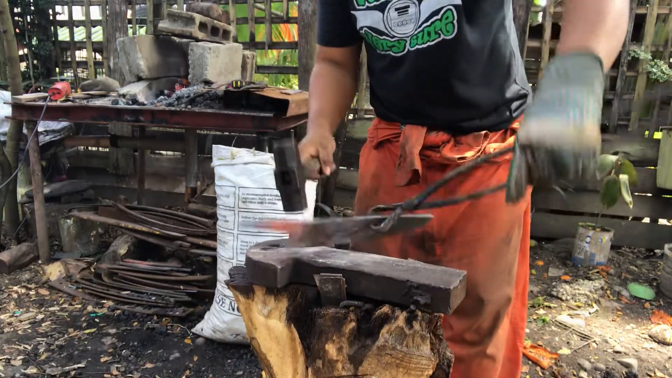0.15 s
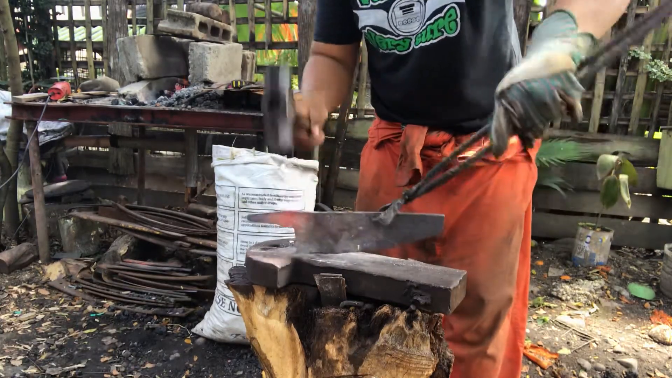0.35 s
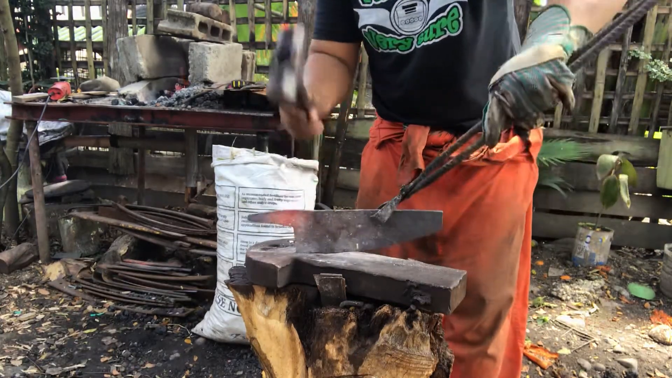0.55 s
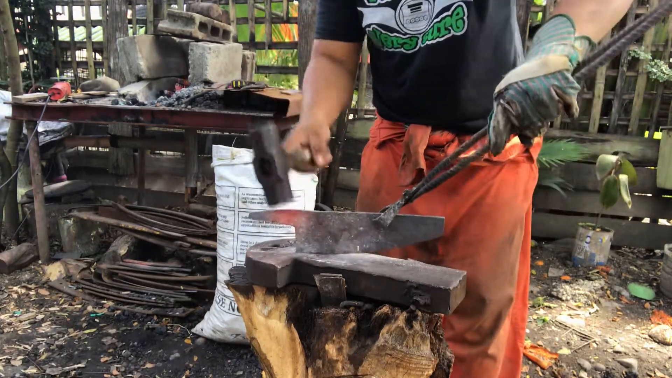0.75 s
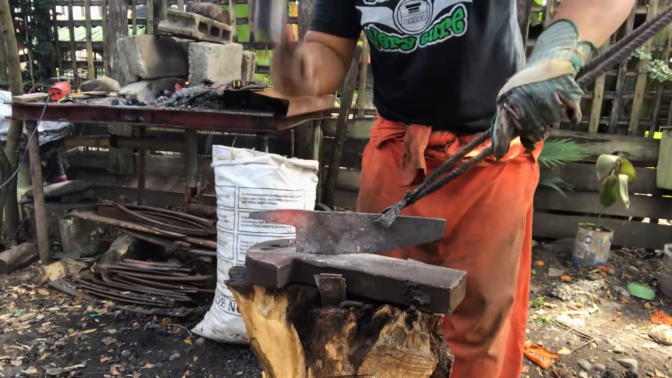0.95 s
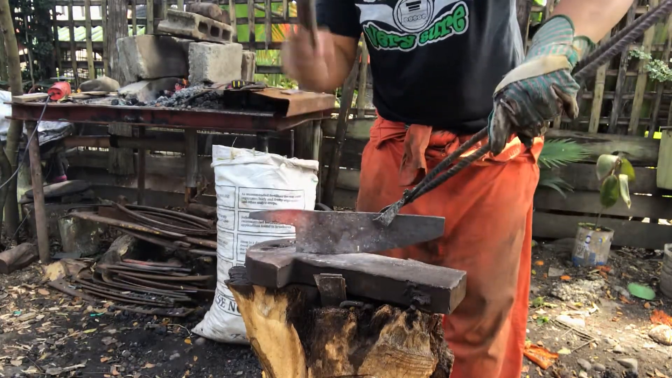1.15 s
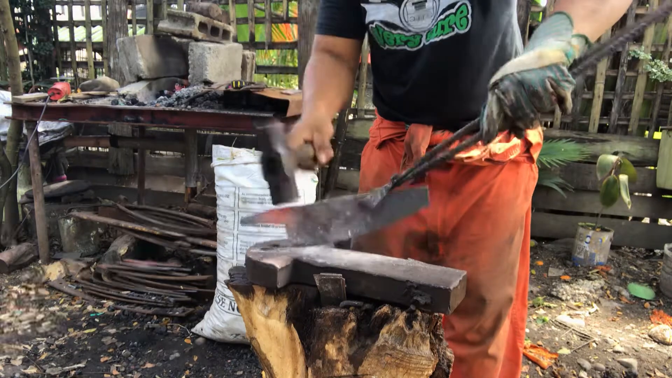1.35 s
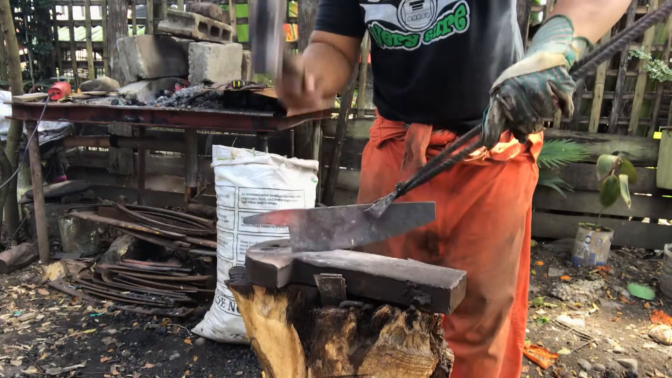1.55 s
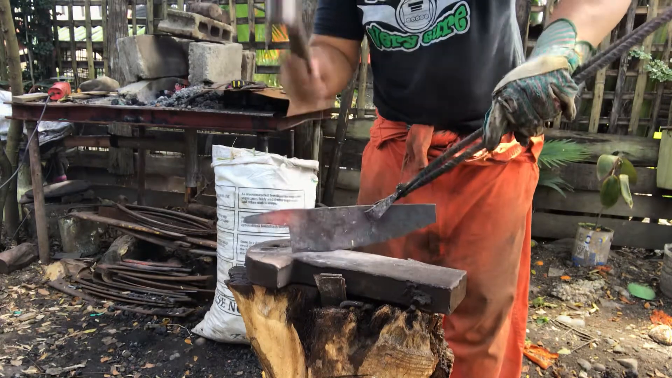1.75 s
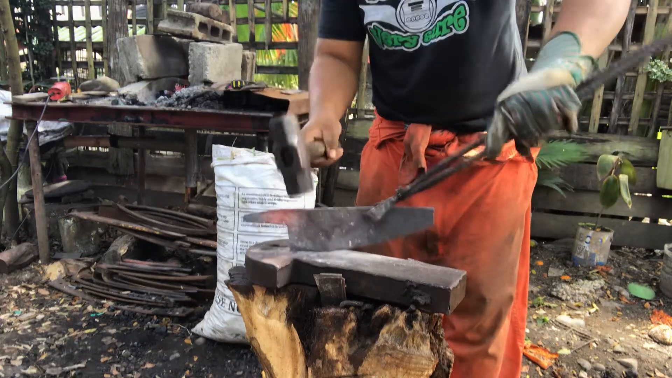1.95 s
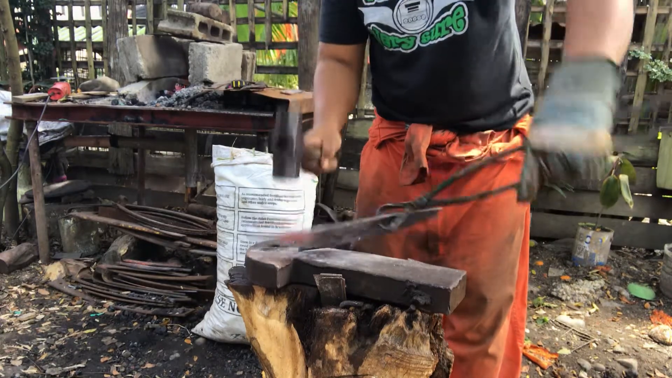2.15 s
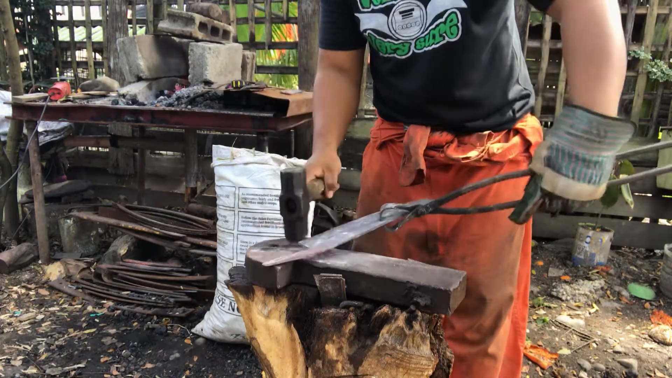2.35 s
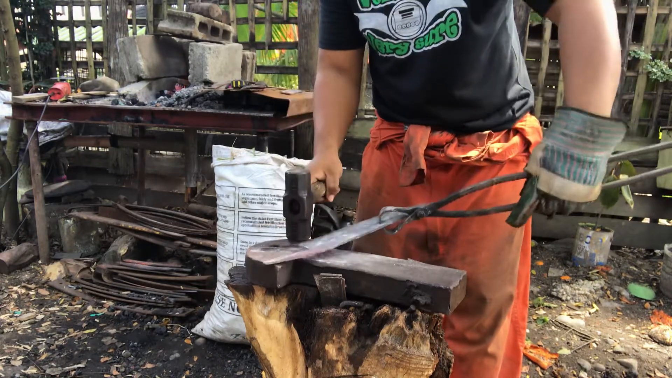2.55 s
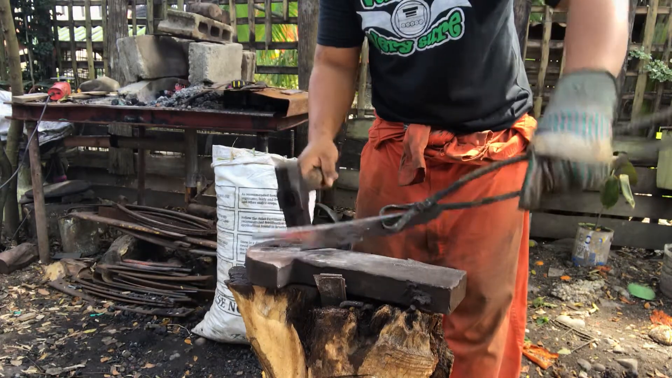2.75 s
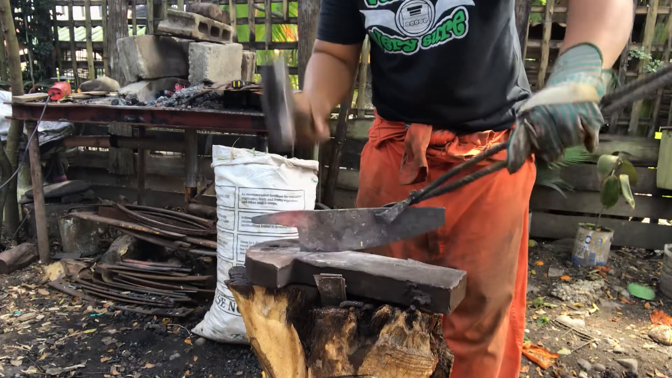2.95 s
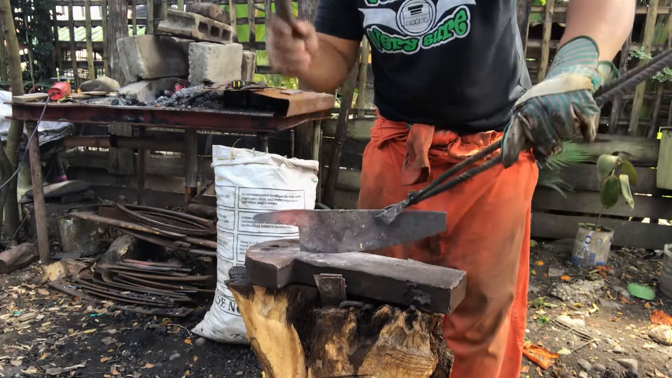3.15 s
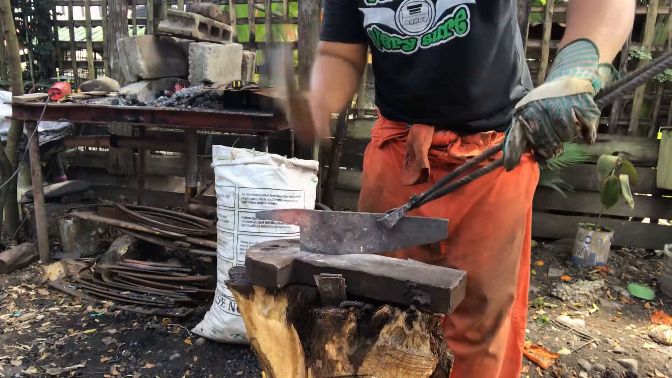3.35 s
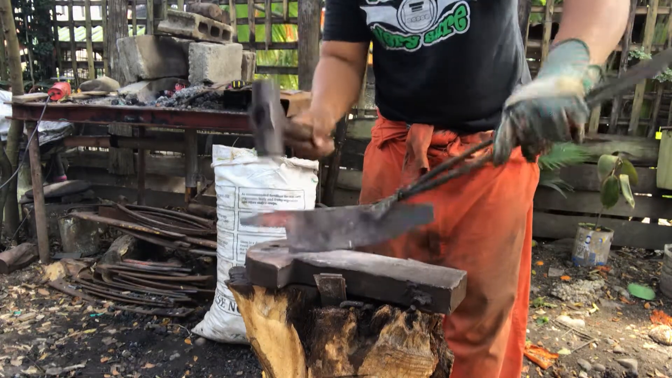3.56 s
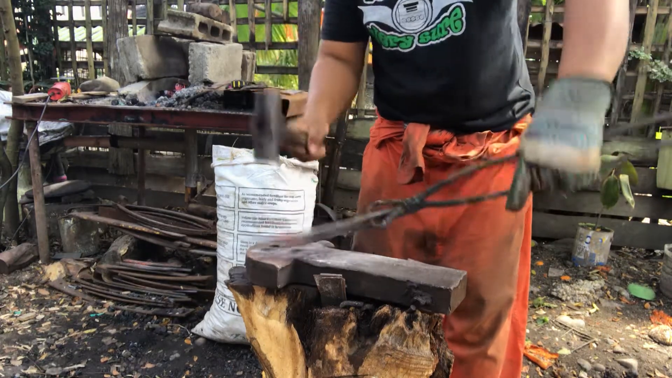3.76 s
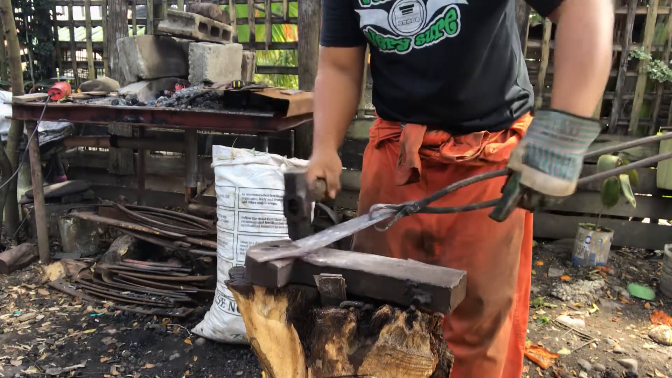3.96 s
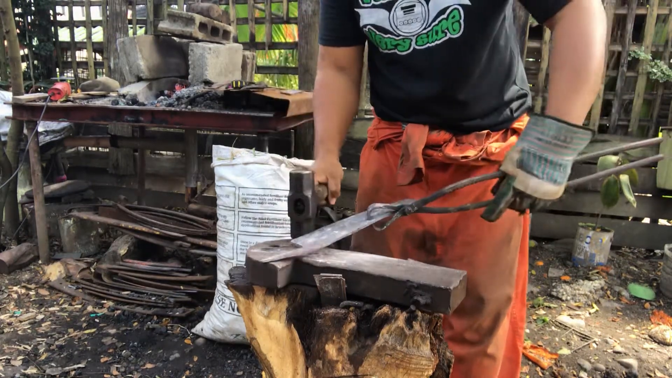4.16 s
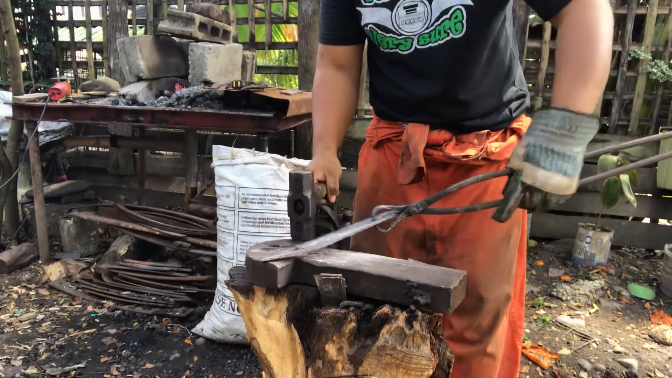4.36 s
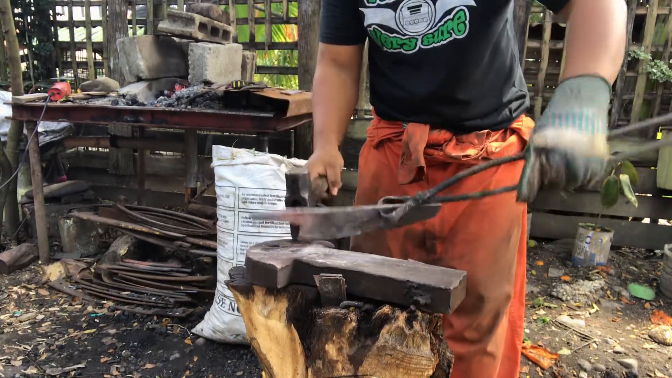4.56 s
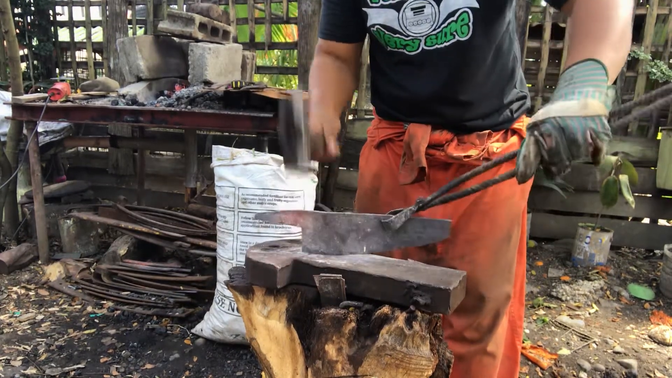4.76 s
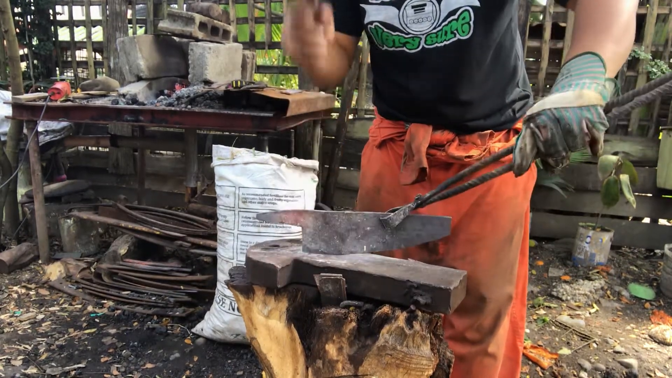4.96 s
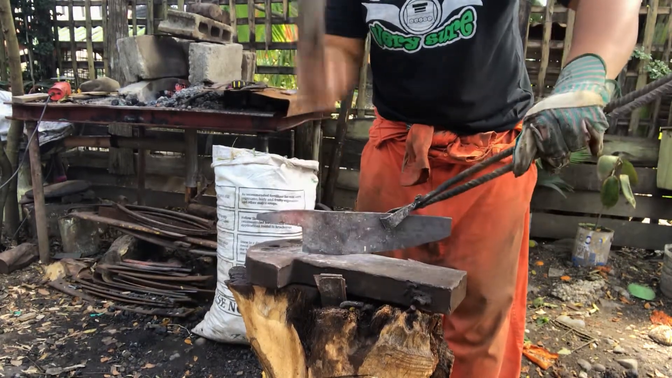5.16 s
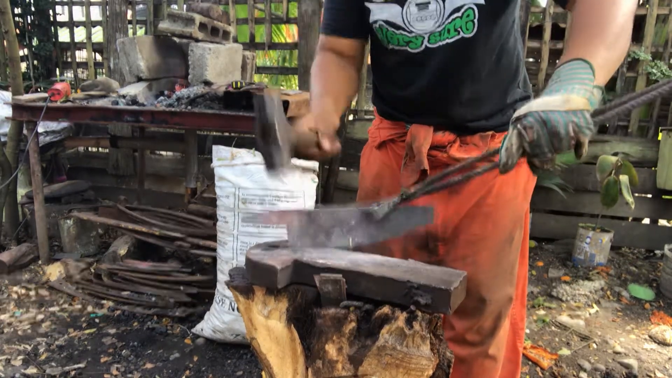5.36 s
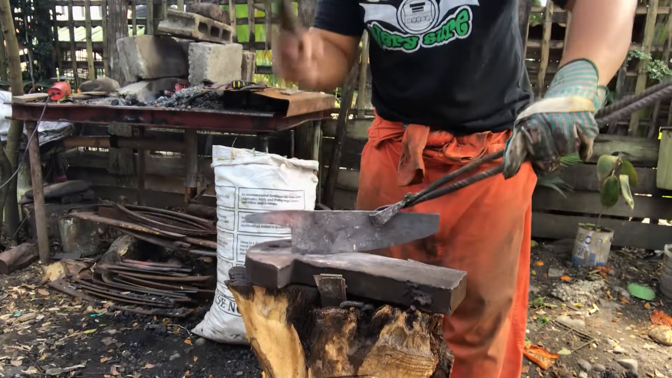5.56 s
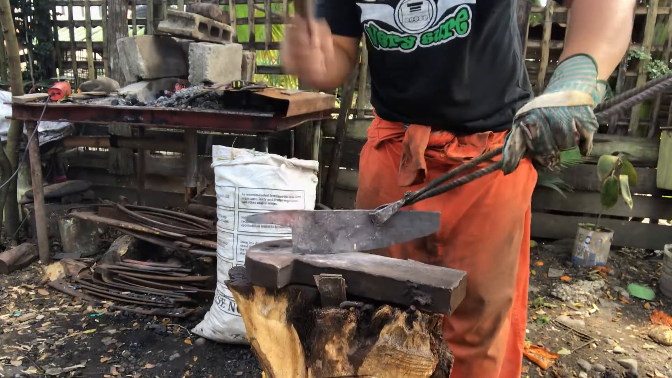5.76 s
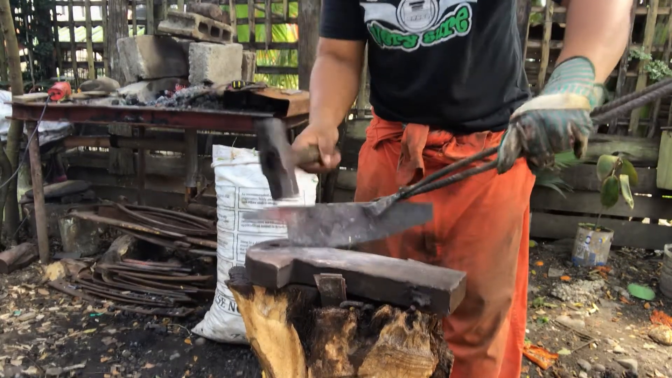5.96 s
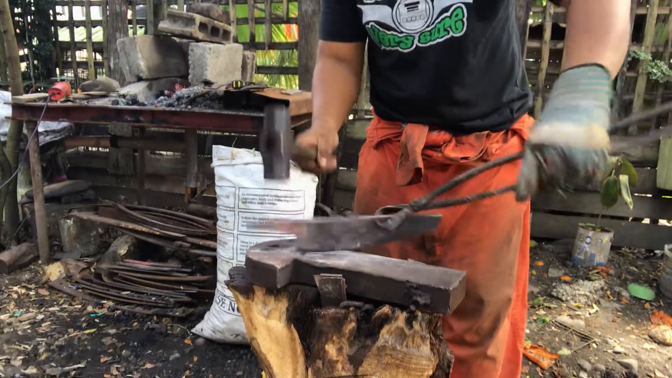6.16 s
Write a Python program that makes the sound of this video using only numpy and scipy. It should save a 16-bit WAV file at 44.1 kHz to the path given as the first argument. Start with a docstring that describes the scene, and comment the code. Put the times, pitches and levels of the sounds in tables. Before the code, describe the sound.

Close hammer strikes crack on hot steel and set a small anvil ringing, high and clear, at an uneven working pace. After a soft opening tap come three solid blows, three more with some buzzing blade rattle, then a tap and two final hits, the first of them the loudest. Blade and tongs clink between strikes. Behind is a soft outdoor hush with very faint barking, and a few low bumps touch the microphone.

```python
"""A smith forges a hot blade on a small steel anvil set on a stump, in an open yard, over a soft hush.
A light tap, then three blows with the blade on edge: each cracks, thuds into the stump, rings the anvil.
At 2.3 s and 4.0 s the blade lies flat and chatters on the face; an edge blow falls between.
A tap follows, the hardest blow at 5.3 s, a last one at 5.9 s. In the gaps blade and tongs clink,
a far dog barks, air and soft bumps stir the microphone. Gain control ducks after each heavy blow."""
import sys
import numpy as np
from scipy import signal
from scipy.fft import rfft, irfft, next_fast_len
from scipy.io import wavfile
from scipy.ndimage import uniform_filter1d, minimum_filter1d, map_coordinates

SR = 44100
rng = np.random.default_rng(int(sys.argv[2]) if len(sys.argv) > 2 else 0)


def digitize_waveform(pressure):
    """Quantize a signal to 16-bit integers and store it at the path in sys.argv[1].

    Rows of a 2-D input are taken as channels; values are limited to [-1, 1].
    """
    field = np.atleast_2d(pressure).T
    bounded = np.clip(field, -1, 1)
    quanta = np.round(bounded * 32767).astype(np.int16)
    wavfile.write(sys.argv[1], SR, quanta)


N = 273420
TIME_S = np.arange(N) / SR

# hammer blows: start_s, crack_db, flat (0 blade on edge, 1 flat), spot (- inward, + toward anvil's end),
# main_ring_db, sideways_ring_db, overtones_db, choke_s
BLOWS = [(0.2644, -22.5, 0.98, -1.5, -30, -49, -59, 0.61), (.695, -3.5, 0.3, 0.65, -1, -22, -11.5, 2.4),
         (1.302, 1, 0.089, 0.92, 9.5, -23.5, .5, 3.9), (1.901, -2.5, 0, 0.011, -0.5, -14, -0.5, 0.59),
         (2.33, -6.5, .85, 0.55, 9, -3.5, 1.5, 0.41), (3.4715, -3.5, 0.062, 0.14, 5.5, -33.5, -5, 0.43),
         (3.9971, -5.5, 0.89, -0.16, 9.5, 0.5, -1, .29), (4.750, -16.5, 0.35, 1, -20, -60, -28.5, 0.22),
         (5.298, 3.5, 0.17, 0.45, 14.5, -44, 6.5, 0.53), (5.9485, -3.5, .05, -1.24, 5, -15.5, 6, 0.56)]
# anvil modes, close pairs beat: pitch_hz, level_db, t60_s
ANVIL_MODES = [(1528, -1.5, .27), (2247.5, 0, 1.35), (2737, -20, .6), (3690, -13, .45), (3705, -3, .46),
               (3712, -2, .5), (4495, -21, .35), (5593, -8, .36), (5633, -1.5, .38), (6142, 0, 1.1),
               (7569, -1, .5), (7978, -1.5, .3), (10115, -14, .35), (10350, -14, .35), (11440, -6, .22),
               (11531, 1, .27), (12790, -12, .22), (13370, -11, .25), (13670, -11, .28), (15334, 0, .26)]
# modes most sensitive to the strike (main, sideways, six overtones): pitch_hz
STRIKE_HZ = [1528, 2248, 3707, 5633, 6142, 7569, 7978, 11531]
# base mix of the six overtones: level_db
OVERTONE_DB = [-15.5, -14, -56, -35.5, -20, -31.5]
# overtones under a flat blade: change_db
FLAT_CHANGE_DB = [-12.5, 5, 3, 13.5, -22, -19]
# overtones toward the anvil's end: change_db
END_CHANGE_DB = [-3.5, -1.5, 25, -4, -1.5, 7]
# hammer contact: freq_hz, level_db
SNAP_SPECTRUM = [(100, -2.5), (400, -22.5), (1000, 3.5), (1800, 12.5), (3300, -0.5), (5000, -1),
                 (7000, -13.5), (10000, -10.5), (15000, 3.5)]
# yielding steel and scale: freq_hz, level_db
CRUNCH_SPECTRUM = [(100, 0.5), (400, -11.5), (1000, 3.5), (1800, -4.5), (3300, 2.5), (5000, 0),
                   (7000, -1.5), (10000, -11.5), (15000, -5.5)]
# stump modes: pitch_hz, level_db, t60_s
STUMP_MODES = [(169.7, -19, 0.029), (272, -8, 0.045), (353, -6.5, 0.041), (541, -9, 0.055),
               (612.5, -0.5, 0.028), (657, -2.5, 0.038), (885, -14, 0.059), (1093, -8.5, 0.068)]
# flat blade rattling on the face: start_s, length_s, level_db
CHATTERS = [(2.338, 0.13, -32.5), (2.405, 0.072, -30), (3.997, 0.12, -31)]
# steel chattering on steel: freq_hz, level_db
CHATTER_SPECTRUM = [(500, -11.5), (2000, -7), (3000, -14), (4400, -4.5), (6500, -1.5), (9200, -0.5),
                    (11000, -9), (15500, -10)]
# high blade modes: pitch_hz, level_db
BUZZ_MODES = [(3740, -2), (4492, -1), (5132, -5), (6800, -6), (8820, -4), (9000, -3), (9260, -6),
              (10115, -9), (13370, -12)]
# blade and tongs settling: start_s, tick_db, body_db, max_t60_s
CLINKS = [(1.409, -29, -56, 0.033), (2.2918, -34.5, -51, .1), (2.307, -31.5, -38, .14),
          (2.66, -48.5, -61, .04), (3.5993, -29, -35, 0.54), (3.842, -43, -56, .06),
          (4.044, -23, -24, 0.012), (4.767, -48, -37.5, 0.059), (5.4243, -19.5, -31.5, .6),
          (5.678, -51, -63, .07), (6.038, -23, -37.5, .11)]
# light steel tick: freq_hz, level_db
TICK_SPECTRUM = [(500, -23), (2000, -2), (4300, 6), (6500, 2.5), (9000, -8), (11000, -7.5), (15500, -13)]
# knocked blade modes: pitch_hz, level_db, t60_s
BLADE_MODES = [(608, -4.5, .1), (1084, 0.5, 0.063), (1900, 8.5, 0.087), (2248, 2, 0.66), (2320, 0, 0.13),
               (4240, -6.5, 0.04)]
# microphone bumps: start_s, level_db, final_pitch_hz
BUMPS = [(0.606, -37, 84), (1.53, -24, 66), (1.618, -31, 97), (1.704, -29, 106), (4.277, -26, 61),
         (4.403, -38, 83.4), (4.894, -16.5, 84.4), (5.046, -34.5, 65)]
# dull puff of a bump: freq_hz, level_db
PUFF_SPECTRUM = [(40, -25), (110, -13), (190, 5), (350, 3.5), (700, -29), (3000, -70)]
# far barks: start_s, level_db, peak_pitch_hz
BARKS = [(.885, -45.5, 378), (2.81, -44.5, 431), (3.105, -46, 332.5), (4.225, -41, 292.3),
         (4.535, -44, 406), (5.74, -45, 501)]
# swell of stirring air: time_s, relative_db
AIR_SWELL = [(0, -61.5), (.6, -56.5), (1.1, -64), (1.75, -56.5), (2.4, -67), (3.3, -55.5), (4.0, -48),
             (5.0, -48), (5.8, -60), (6.2, -44)]
# air at the microphone: freq_hz, level_db
RUMBLE_SPECTRUM = [(20, -24.5), (40, -1), (65, 3), (120, -12), (250, -30), (600, -55)]
# far hush: freq_hz, level_db
HUSH_SPECTRUM = [(25, -28), (70, -1), (130, -1.5), (300, -1), (480, -4.5), (750, -6.5), (1500, -8.5),
                 (2000, -12), (2700, -13), (4000, -14.5), (6000, -16.5), (8000, -20.5), (10500, -25),
                 (15500, -23.5)]
# yard echo decay: freq_hz, t60_s
YARD_DECAY = [(200, 0.49), (2000, 0.33), (6000, 0.27), (15000, 0.28)]


def amp(db):
    """Decibels to gain."""
    return 10 ** (np.asarray(db) / 20)


def unit_rms(x):
    """Scale to rms 1."""
    return x / np.sqrt(np.mean(x ** 2) + 1e-20)


def curve_at(points, hz):
    """Interpolate (freq_hz, value) points on a log axis."""
    knots_hz, values = np.transpose(points)
    return np.interp(np.log(hz + 1), np.log(knots_hz), values)


def coloured(x, spectrum):
    """Filter by a spectrum; rms 1."""
    gain = amp(curve_at(spectrum, np.fft.rfftfreq(len(x), 1 / SR)))
    return unit_rms(irfft(rfft(x) * gain, len(x)))


def noise(spectrum, size):
    """Coloured noise, rms 1."""
    return coloured(rng.standard_normal(size), spectrum)


def wobble(rate_hz):
    """Smooth random curve."""
    return map_coordinates(rng.standard_normal(int(N * rate_hz / SR) + 4), [TIME_S * rate_hz])


def decay(t, t60_s):
    """Exponential decay."""
    return amp(-60 * t / t60_s)


def ring(modes, t, scatter_db, waver_hz=0):
    """Damped sines, random in level and phase; shifting contact wavers each pitch."""
    out, knots_s = np.zeros(len(t)), TIME_S[::SR // 200]
    for hz, db, t60_s in modes:
        drift = np.interp(t, knots_s, rng.standard_normal(len(knots_s)))
        turns = np.cumsum(hz + waver_hz * drift) / SR + rng.random()
        out += amp(db + scatter_db * rng.standard_normal()) * decay(t, t60_s) * np.sin(2 * np.pi * turns)
    return out


def add(track, start_s, sound):
    """Mix in at start_s."""
    part = track[round(start_s * SR):][:len(sound)]
    part += sound[:len(part)]


def trailing(filter1d, x, window_s):
    """Filter over the window just past."""
    size = 2 * round(window_s * SR / 2) + 1
    return filter1d(x, size, origin=size // 2, mode="nearest")


def anvil(edge_rise_s=0.0095, flat_rise_s=0.0024, flat_t60_s=0.39, choke_power=3.15):
    """The ring swells as the hammer presses into soft steel; the settling blade damps it ever harder."""
    out = np.zeros(N)
    ends_s = [blow[0] for blow in BLOWS[1:]] + [N / SR]  # the next blow stops the ring
    for (start_s, _, flat, spot, main_db, sideways_db, overtones_db, choke_s), end_s in zip(BLOWS, ends_s):
        t = TIME_S[:round((end_s - start_s) * SR)]
        mix_db = np.array(OVERTONE_DB) + flat * np.array(FLAT_CHANGE_DB) + spot * np.array(END_CHANGE_DB)
        strike_db = [main_db, sideways_db, *(overtones_db + mix_db)]
        rub_per_s = flat / flat_t60_s  # a flat blade rubs on the face
        modes = [(hz, db + np.interp(hz, STRIKE_HZ, strike_db), 1 / max(1 / t60_s, rub_per_s))
                 for hz, db, t60_s in ANVIL_MODES]
        rise_s = edge_rise_s * (flat_rise_s / edge_rise_s) ** flat  # on edge it yields slowly
        swell = 1 - np.exp(-(t / rise_s) ** 2)
        choke = decay(t ** choke_power, choke_s ** choke_power)
        add(out, start_s, ring(modes, t, scatter_db=1.5, waver_hz=3.25) * swell * choke)
    return out


def hammer_impacts(flat_db_per_octave=-10):
    """Sharp contact, crunch of yielding steel and scale, thud of the stump."""
    out, t = np.zeros(N), TIME_S[:SR // 4]
    for start_s, crack_db, flat, spot, *_ in BLOWS:
        tilt = flat * flat_db_per_octave  # a flat blade breaks little scale: less treble
        snap, crunch = [noise([(hz, db + tilt * max(np.log2(hz / 4000), 0)) for hz, db in points], len(t))
                        for points in (SNAP_SPECTRUM, CRUNCH_SPECTRUM)]
        crack = snap * decay(t, t60_s=0.01) + amp(-7) * crunch * decay(t, t60_s=0.06)
        crack *= 1 - np.exp(-t / 0.0001)
        seating = 1 + 0.02 * rng.standard_normal()  # the anvil sits differently each blow
        thud = ring([(hz * seating, db, t60_s) for hz, db, t60_s in STUMP_MODES], t, scatter_db=1.5)
        thud *= 1 - np.exp(-t / 0.0022)
        thud_db = -7.5 - 7 * flat - 2.5 * spot
        add(out, start_s, amp(crack_db) * (crack + amp(thud_db) * thud))
    return out


def blade_chatter(droop_db=4):
    """The flat blade bounces once per cycle of the anvil's main mode and sings in its own high modes."""
    out, bounce_hz = np.zeros(N), ANVIL_MODES[0][0]
    for start_s, length_s, db in CHATTERS:
        t = TIME_S[:round(length_s * SR)]
        progress = t / length_s
        contacts = np.diff(np.floor(bounce_hz * t), prepend=0) * rng.standard_normal(len(t))
        buzz = ring([(hz, mode_db, 1) for hz, mode_db in BUZZ_MODES], t, scatter_db=3, waver_hz=12)
        envelope = amp(db - droop_db * progress) * (1 - progress ** 6)
        add(out, start_s, envelope * (coloured(contacts, CHATTER_SPECTRUM) + amp(-4) * unit_rms(buzz)))
    return out


def clinks(bounce_s=0.02, bounce_db=-12.5):
    """Blade and tongs knock: a tick and a brief blade ring, then one weaker bounce."""
    out, t = np.zeros(N), TIME_S[:SR // 2]
    for start_s, tick_db, body_db, max_t60_s in CLINKS:
        modes = [(hz, db, min(t60_s, max_t60_s)) for hz, db, t60_s in BLADE_MODES]
        for delay_s, gain_db in (0, 0), (bounce_s, bounce_db):
            body = amp(body_db) * ring(modes, t, scatter_db=3.5)
            tick = amp(tick_db) * noise(TICK_SPECTRUM, len(t)) * decay(t, t60_s=0.05)
            add(out, start_s + delay_s, amp(gain_db) * (tick + body))
    return out


def microphone_bumps(peak_s=0.0028, sag=0.46, full_puff_hz=86.7, puff_db_per_octave=45):
    """A low swing that slows as it dies, with a dull puff; slower bumps puff less."""
    out, t = np.zeros(N), TIME_S[:SR // 5]
    for start_s, db, hz in BUMPS:
        puff = noise(PUFF_SPECTRUM, len(t)) * decay(t, t60_s=0.047) * np.minimum(t / 0.002, 1) ** 2
        puff_db = -5.5 + puff_db_per_octave * min(np.log2(hz / full_puff_hz), 0)
        turns = hz * (t + sag * peak_s * (1 - np.exp(-t / peak_s)))
        swing = np.sin(2 * np.pi * turns) * t / peak_s * np.exp(1 - t / peak_s)
        add(out, start_s, amp(db) * (swing + amp(puff_db) * puff))
    return out


def dog(length_s=0.0634, roughness=0.094, pitch_arch=0.136):
    """Short hoarse barks, rising and falling in pitch, dulled by distance."""
    out = np.zeros(N)
    swell = np.sin(np.linspace(0, np.pi, round(length_s * SR)))
    for start_s, db, hz in BARKS:
        jitter = roughness * noise([(200, 9), (600, -37), (2000, -74)], len(swell))
        phase = 2 * np.pi * np.cumsum(hz * (1 + pitch_arch * (swell - 1) + jitter)) / SR
        voice = sum(np.sin(k * phase) for k in range(1, 5)) + 1.1 * rng.standard_normal(len(swell))
        bark = coloured(voice, [(280, -36), (550, 12), (900, 5), (1500, -9), (4000, -47)])
        add(out, start_s, amp(db) * swell ** 2 * bark)
    return out


def outdoor_air(hush_follow=0.16):
    """Light air rumbles at the microphone; the far hush swells a little with it."""
    air_db = np.interp(TIME_S, *np.transpose(AIR_SWELL))
    hush_db = -48 + hush_follow * (air_db - air_db.mean()) - 0.5 * wobble(rate_hz=32)
    hush = amp(hush_db) * noise(HUSH_SPECTRUM, N)
    rumble_db = air_db + 3 + 2 * wobble(rate_hz=9.2)
    return hush + amp(rumble_db) * noise(RUMBLE_SPECTRUM, N)


def yard_echo(x, delay_s=0.008):
    """Fence, bench and ground scatter a short echo."""
    hz, t, bands = signal.stft(rng.standard_normal(SR // 2), SR, nperseg=256)
    tail = signal.istft(bands * decay(t, curve_at(YARD_DECAY, hz)[:, None]), SR, nperseg=256)[1]
    delayed = np.pad(x, (round(delay_s * SR), 0))
    return signal.fftconvolve(delayed, tail / np.linalg.norm(tail))[:N]


def scene():
    """Smith in front, yard behind; mono."""
    tone = anvil()
    knocks = hammer_impacts() + blade_chatter() + clinks()
    barks = dog()
    echo = yard_echo(amp(-22) * tone + amp(-14.5) * knocks + amp(-14) * barks)
    return (tone + knocks + barks + echo + microphone_bumps() + outdoor_air())[None]


def gain_control(x, threshold_db=-14, slope=0.48, release_db_per_s=55):
    """Loud sound cuts the gain after a lag; it holds, then climbs back."""
    lag_s, attack_s, hold_s = 0.021, 0.022, 0.15
    power = trailing(uniform_filter1d, x ** 2, window_s=0.0021)
    level_db = 10 * np.log10(np.abs(power) + 1e-12)
    held_db = trailing(minimum_filter1d, np.minimum(0, slope * (threshold_db - level_db)), hold_s)
    climb_db = release_db_per_s * TIME_S
    released_db = np.minimum.accumulate(held_db - climb_db) + climb_db
    gain_db = trailing(uniform_filter1d, released_db, attack_s)
    return x * amp(np.interp(TIME_S - lag_s, TIME_S, gain_db))


def limiter(x, ceiling=0.98, window_s=0.0014):
    """Fast gain dips flatten the first cycles of a loud ring."""
    size = 2 * round(window_s * SR / 2) + 1
    gain = ceiling / np.maximum(np.abs(x), ceiling)
    return x * uniform_filter1d(minimum_filter1d(gain, size), size)


def record(dry):
    """Phone microphone: low cut, gain control, limiter, band limit."""
    low_cut_hz, top_hz, taper_hz = 36, 16100, 500
    x = signal.sosfilt(signal.butter(2, low_cut_hz, "highpass", fs=SR, output="sos"), dry[0])
    x = limiter(gain_control(x))
    size = next_fast_len(N + SR // 2)
    taper = np.clip((top_hz - np.fft.rfftfreq(size, 1 / SR)) / taper_hz, 0, 1)
    return irfft(rfft(x, size) * np.sin(taper * np.pi / 2) ** 2, size)[None, :N]


dry = scene()
out = record(dry)
digitize_waveform(out)
```